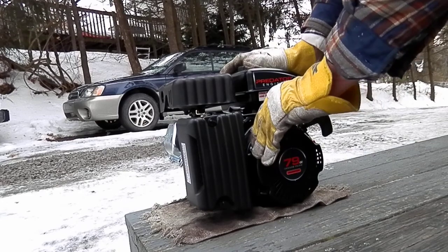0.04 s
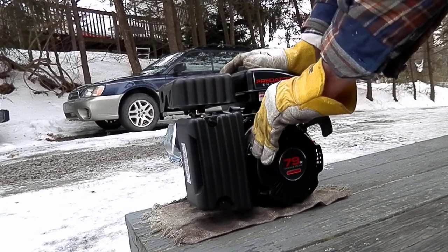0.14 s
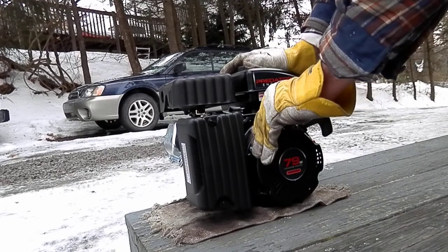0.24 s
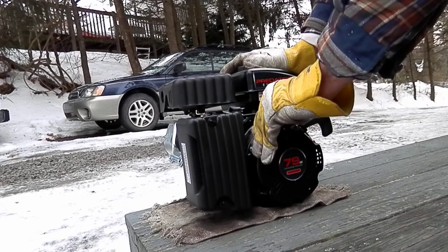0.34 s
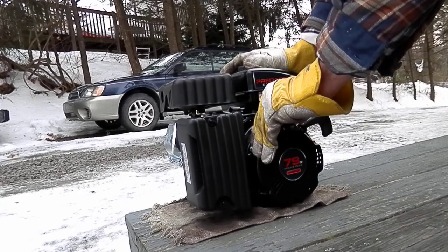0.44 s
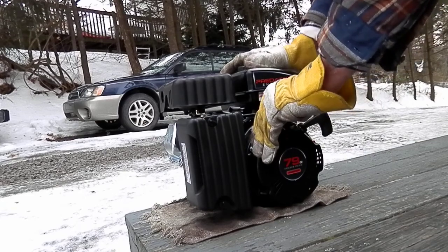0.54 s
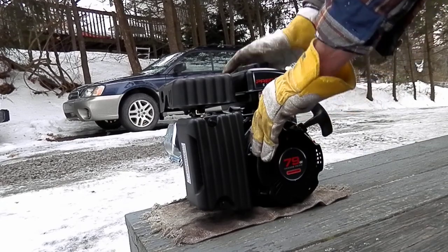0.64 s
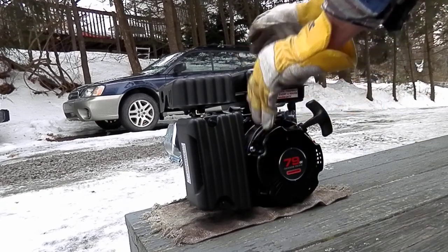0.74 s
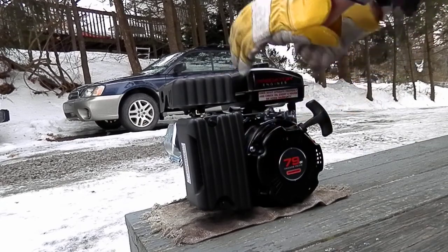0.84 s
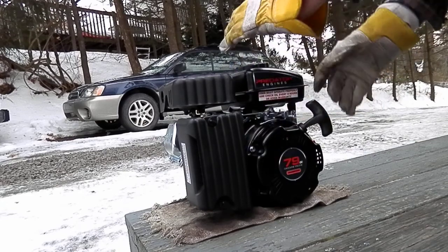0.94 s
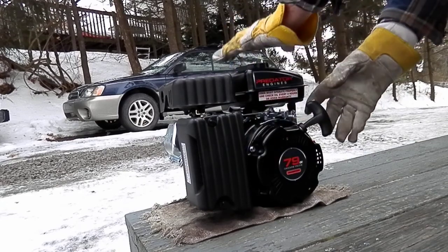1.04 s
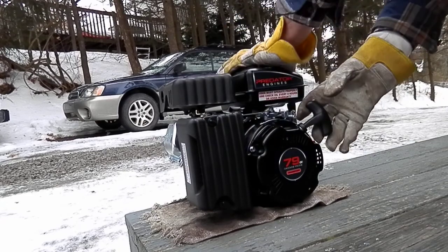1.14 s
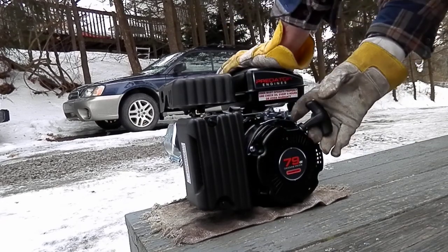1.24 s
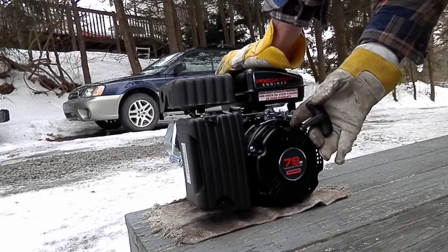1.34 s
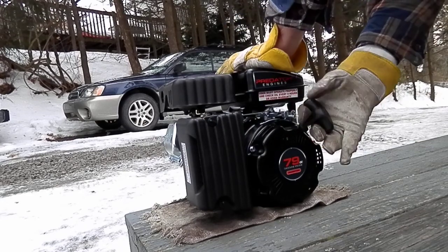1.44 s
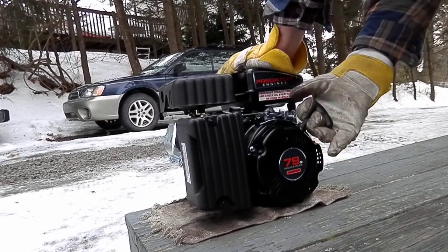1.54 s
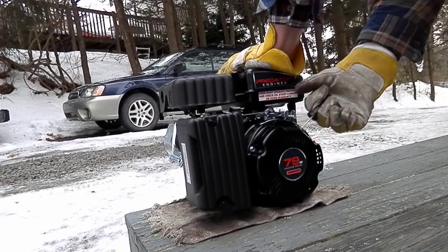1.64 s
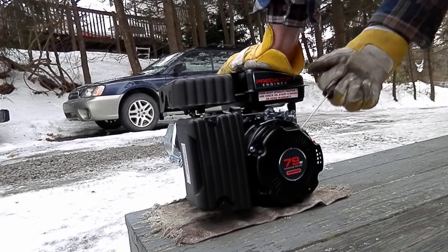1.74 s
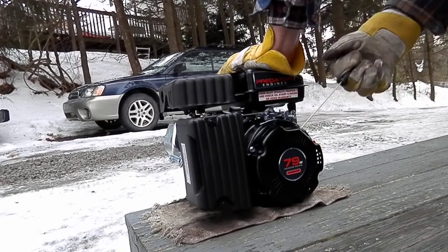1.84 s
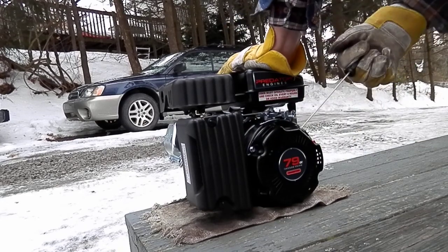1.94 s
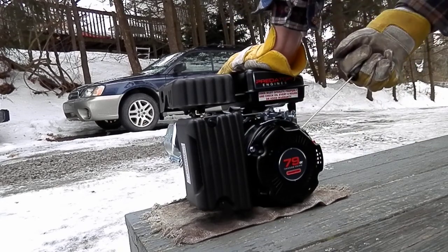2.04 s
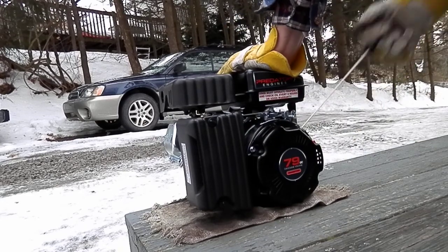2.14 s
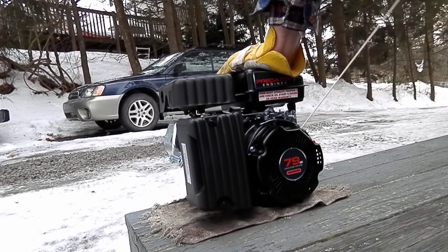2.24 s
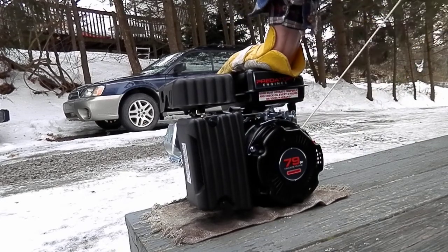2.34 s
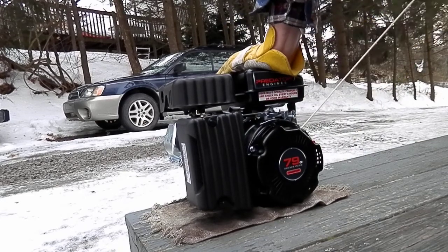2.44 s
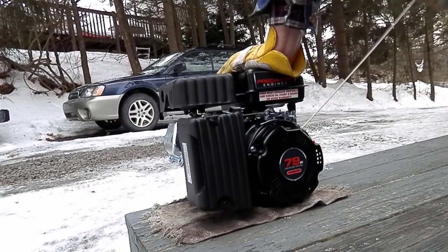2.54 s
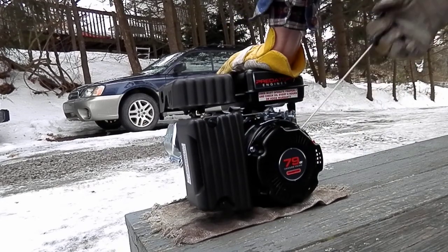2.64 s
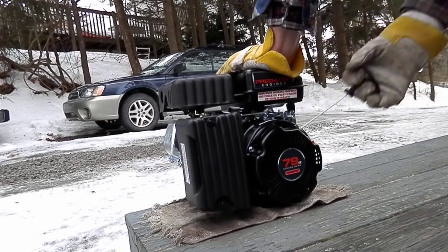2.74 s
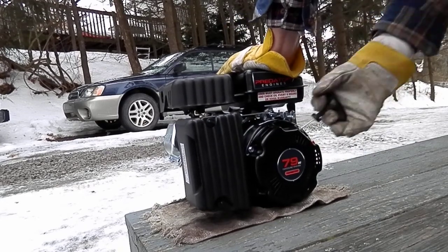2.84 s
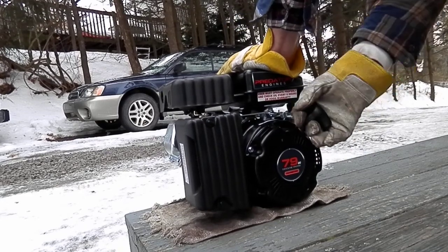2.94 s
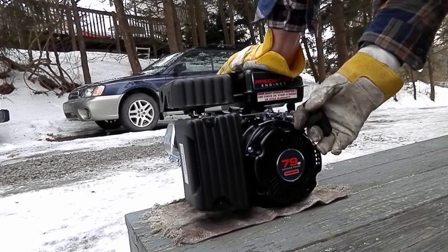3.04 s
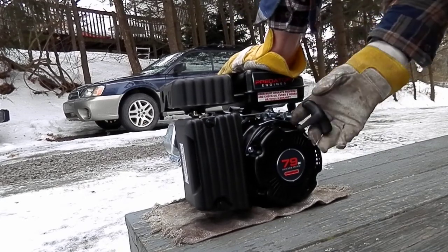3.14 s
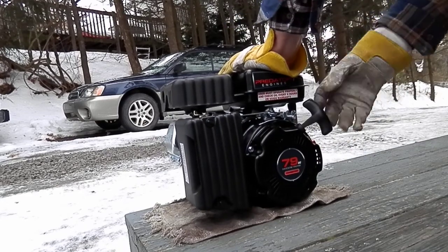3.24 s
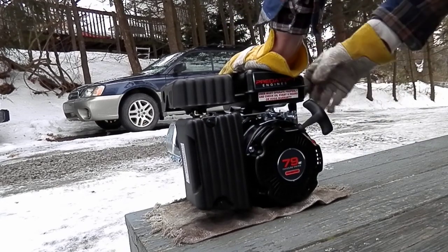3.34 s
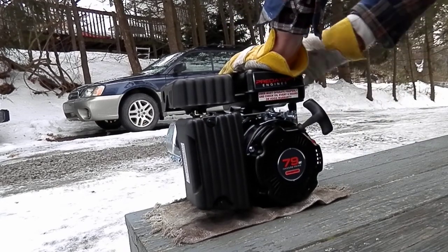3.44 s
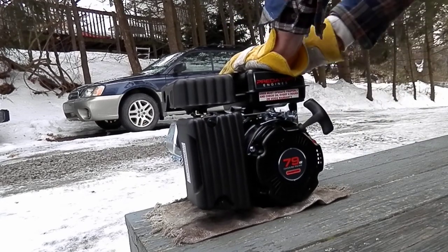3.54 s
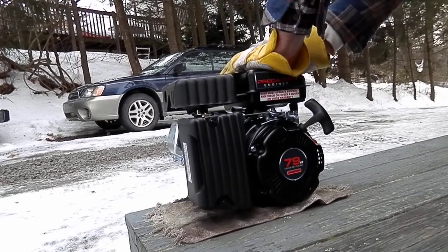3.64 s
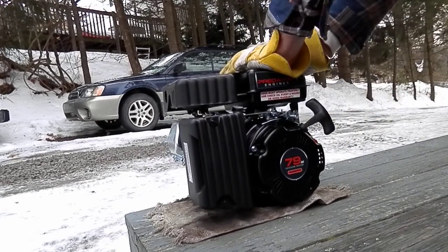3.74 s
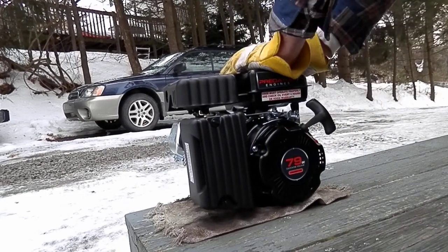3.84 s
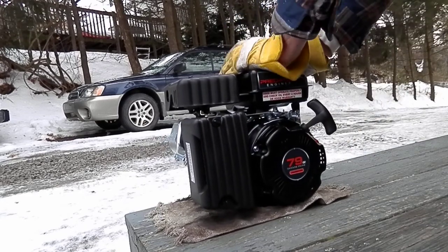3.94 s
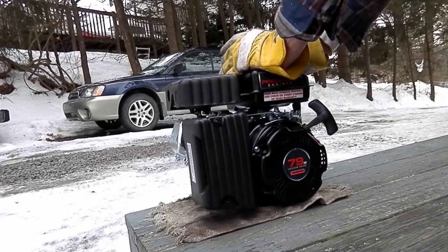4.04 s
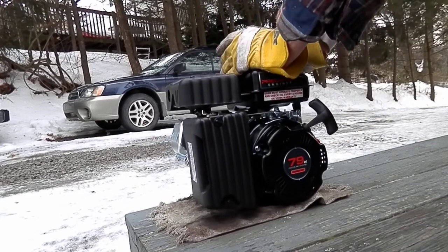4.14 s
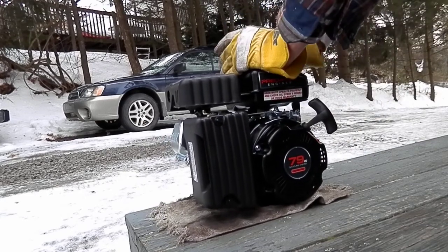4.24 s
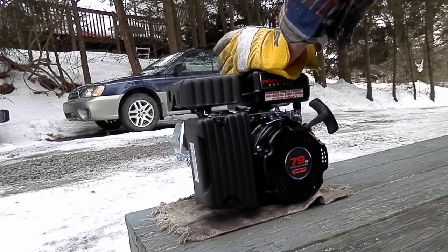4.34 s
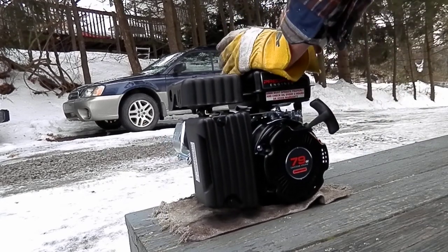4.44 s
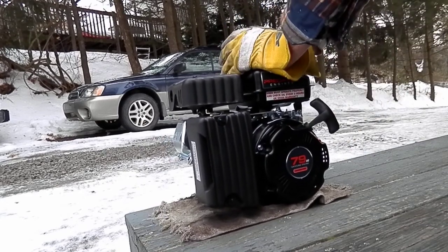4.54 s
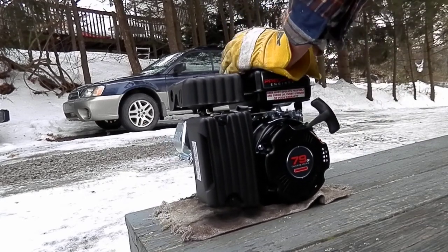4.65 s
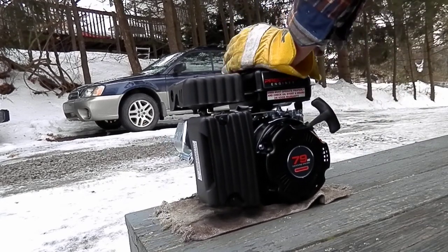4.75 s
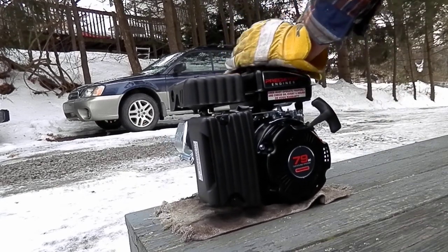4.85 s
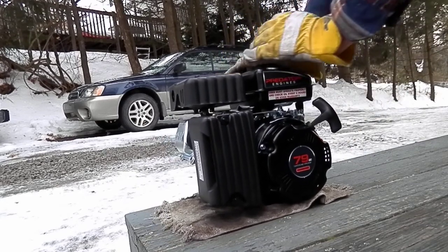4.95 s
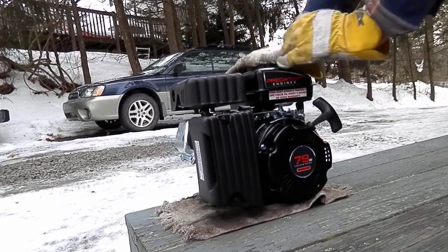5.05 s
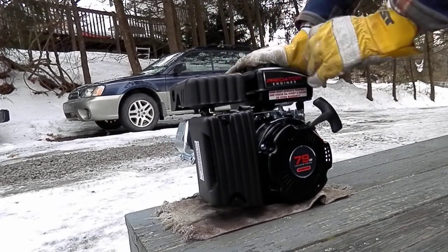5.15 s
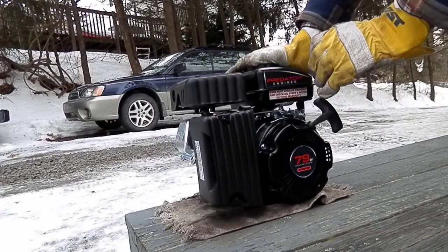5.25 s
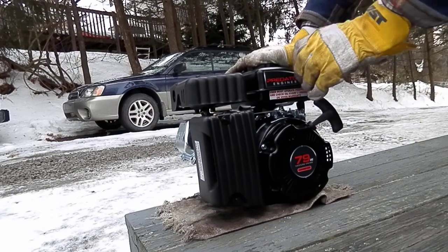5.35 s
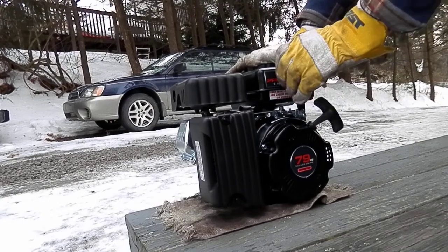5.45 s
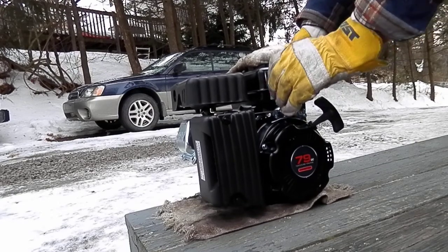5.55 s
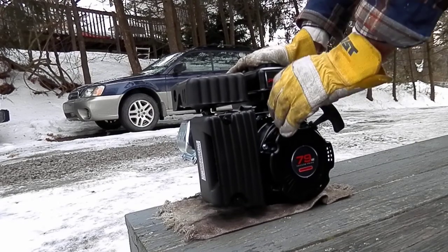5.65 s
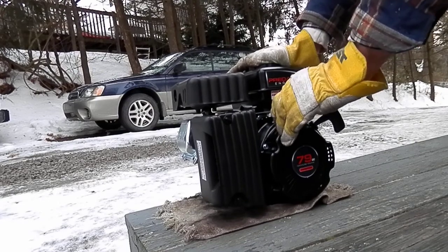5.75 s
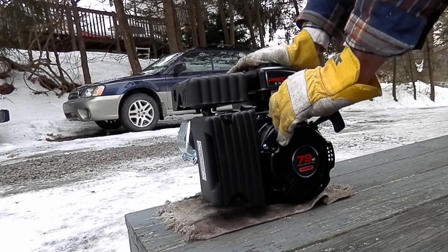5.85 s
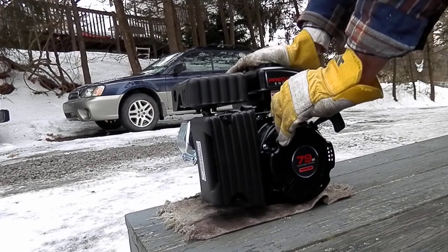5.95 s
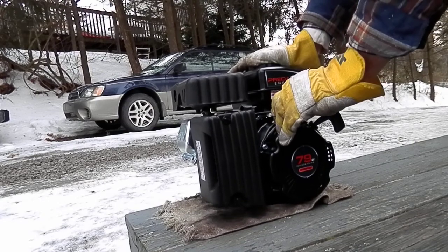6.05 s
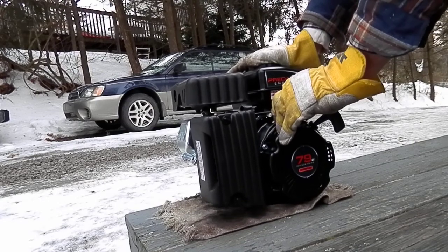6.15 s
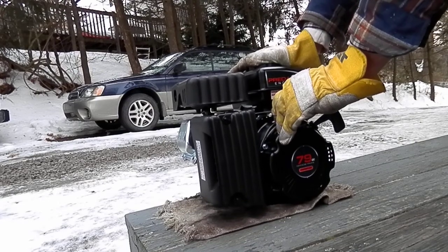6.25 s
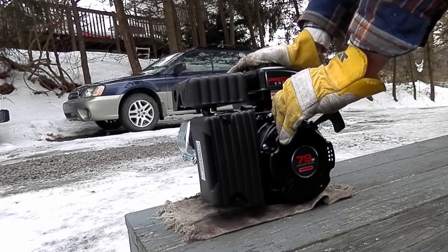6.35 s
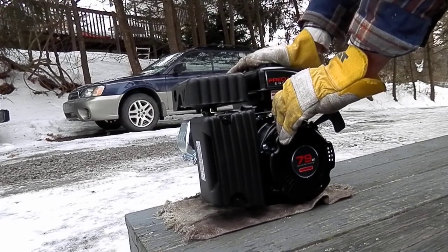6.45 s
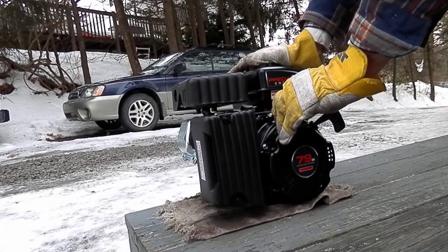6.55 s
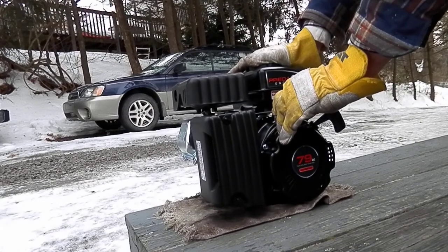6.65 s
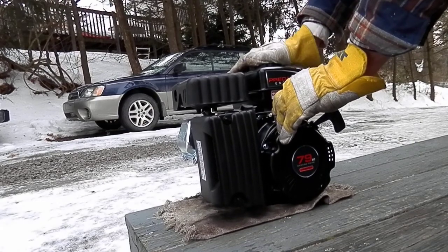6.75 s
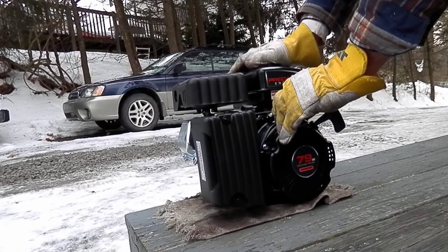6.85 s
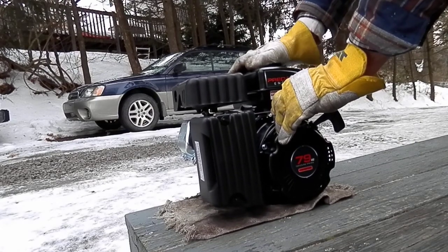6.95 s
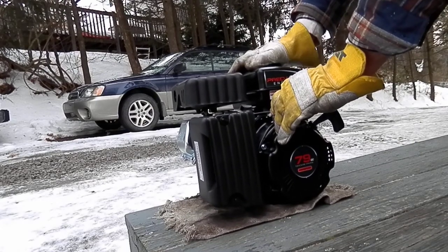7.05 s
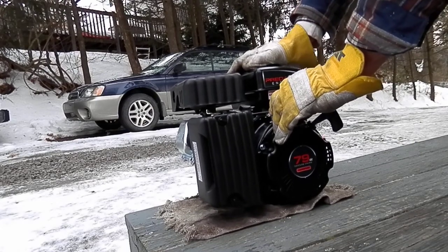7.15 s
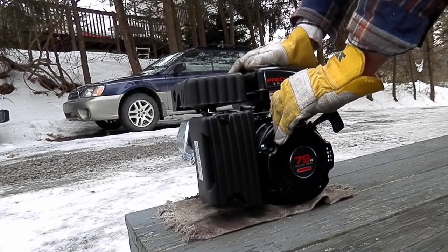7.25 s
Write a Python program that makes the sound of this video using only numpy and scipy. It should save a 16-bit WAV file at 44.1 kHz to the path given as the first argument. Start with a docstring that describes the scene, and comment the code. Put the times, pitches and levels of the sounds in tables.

```python
"""A glove clicks levers over a faint whine; then a starter cord rattles out twice and a small petrol
engine catches on an outdoor wooden bench. It coasts twice as the governor hunts, then settles.
Engine: pulses on one crank angle ring pipe, shroud and casing and gate noise; tones shake the bench.
Starter: ratchet clicks, gritty noise. Hand: noise ticks and struck modes.
Background: lumpy rumble noise, camera whine as two tones with pulsing hiss."""
import sys
import numpy as np
from scipy import signal
from scipy.fft import rfft, irfft
from scipy.io import wavfile
from scipy.ndimage import uniform_filter1d

SR = 44100
rng = np.random.default_rng(int(sys.argv[2]) if len(sys.argv) > 2 else 0)


def waveform_to_disk(signal):
    """Save audio, clipped to [-1, 1], as 16-bit WAV at the path in sys.argv[1]."""
    frames = np.transpose(np.atleast_2d(signal))
    scaled = np.clip(frames, -1, 1) * 32767
    samples = np.round(scaled).astype(np.int16)
    wavfile.write(sys.argv[1], SR, samples)


N = 321489
T = np.arange(N) / SR

# Spectrum levels are relative unless stated: each noise is brought to rms 1, then scaled.
# four-stroke cycle rate, two crank turns a cycle: t/s, f/Hz
CYCLE_RATE = [(2.35, 7.71), (2.47, 13.05), (2.57, 19.14), (2.74, 31.95), (2.83, 34.32), (3.05, 29.98),
              (3.27, 34.16), (3.45, 30.39), (3.7, 32.81), (4.08, 31.66), (4.47, 32.37), (4.64, 31.5),
              (4.95, 32.22), (5.33, 31.2), (5.56, 31.85), (5.73, 31.58), (6.05, 32.24), (6.74, 32.02),
              (7.12, 31.06), (7.29, 31.49)]
CATCH_S = CYCLE_RATE[0][0]
FIRST_CYCLE = .209  # share of a cycle done when the crank starts to spin
# charge does not burn: from/s, to/s
COASTS = [(2.81, 3.05), (3.3, 3.43)]
# burn strength as the governor works the throttle, re steady running: t/s, level/dB
LOAD = [(2.35, -22), (2.52, -7.5), (2.72, -2), (3.07, -6), (3.45, -3), (3.7, 0.5), (4, 1), (4.4, 1),
        (4.95, 3.5), (5.3, -0.5), (5.6, 1.5), (5.9, -2.5), (6.2, 3.5), (6.55, 1.5), (6.8, 1.5), (7.1, -3),
        (7.29, -4)]
# piston shake of the bench, twice a turn, hardest where a coast drags the speed down: t/s, level/dB
SHAKE = [(2.66, -27.5), (2.75, -19), (2.84, -28), (3.03, -15), (3.25, -24.5), (3.43, -10.5), (3.49, -18.5),
         (4.1, -21.5), (5.8, -20), (7.29, -18.5)]
# shake overtones: times per cycle, level/dB, lag/share of own period
SHAKE_OVERTONES = [(5, 2, 0.059), (6, -10, 0.35), (7, 1, 0.903), (8, -7, 0.41), (10, -11.5, 0.39)]
SHAKE_LAG = 0.33  # behind the firing, share of the shake's period
OVERTONES_DB, ROCK_DB = -33.5, -31.5  # at full speed
# one blast through the muffler: f/Hz, level/dB
MUFFLER = [(25, -49), (40, -24.5), (70, -21.5), (95, -13.5), (125, -1.5), (160, -13.5), (200, -8),
           (255, -16), (288, -9.5), (317, -23.5), (350, -16), (450, -29.5), (600, -47), (1000, -70.5)]
# piston gulping air: share of cycle, level/dB re blast, Gaussian width/s
INTAKE = (0.3728, -11, 0.00044)
LEAD_S = .0023  # low blast pulse, inverted, leads the spit by this
UNBURNT_DB, UNBURNT_SPIT_DB = -6.5, -22  # blast and spit left in a coast
# gas jet at the outlet: f/Hz, level/dB per Hz
SPIT = [(1760, -1), (3000, -5), (4700, -47), (5420, -0.5), (7110, 0.5), (8200, -4), (9730, 2), (10600, -5),
        (14300, 8.5), (16000, -1), (16500, -84)]
# outlet pipe modes: f/Hz, level/dB, t60/s
PIPE = [(533.6, -1, 0.06), (573.7, 5.5, 0.056), (704, -11, 0.14)]
# slow swell of the pipe ring: t/s, level/dB
PIPE_SWELL = [(3.5, -1.5), (4.4, 2.5), (5.4, -4), (6.3, 0.5), (7.29, -2.5)]
# thin fan shroud modes: f/Hz, level/dB, t60/s
SHROUD = [(904.2, -0.5, 0.13), (1036, -4, 0.091)]
# block, fin and cover modes: f/Hz, width/Hz, level/dB
CASING = [(990, 590, -0.5), (1498, 28, -14), (1620, 82, -7.5), (2268, 91, -7.5), (2970, 670, -11),
          (3636, 12, -18.5), (4110, 165, -13.5), (4580, 130, -13.5), (6900, 230, -18)]
# valve-train blows: share of cycle, level/dB, centre of modes shaken f/Hz, spread/octaves
VALVES = [(.03, -1, 2370, 0.6), (.335, 0.5, 2980, 1.65), (.46, 2.5, 1500, 0.69), (.62, -5.5, 2500, 1.5),
          (.83, -3, 1070, 0.35)]
# cooling fan and intake air: f/Hz, level/dB per Hz
FAN_AIR = [(40, -36), (115, -12), (160, -16.5), (400, -27), (800, -31.5), (1200, -25.5), (2000, -28),
           (4000, -34), (5500, -41.5), (10600, -52), (14300, -40.5), (16500, -111)]
# layer laws: running level/dB, share of load followed, level offset at the catch/dB, settling time/s
BLAST_LAW = (-22.5, 0.8, -1.5, 0.6)
SPIT_LAW = (-42, 1.22, 9.5, 0.37)
CLATTER_LAW = (-28, 0.49, -24, 0.55)
PIPE_LAW = (-27.5, 0.47, -12.5, .5)
SHROUD_LAW = (-31.5, 0.4, -28, 0.6)
# cord pulls: taut t/s, full speed t/s, let go t/s, level/dB, run-out/dB per s
PULLS = [(1.582, 1.715, 1.8, -37.5, 130), (2.075, 2.21, 2.325, -29.5, 30)]
SLACK_DB, STOP_DB, STOP_S = -22, -18, 0.017  # at cord taut; quick drop after let-go, its length
RATCHET_PER_S = 500  # mean tooth rate
# reel and glove rub: f/Hz, level/dB per Hz
REEL = [(35, -31), (60, -13), (169, -0.5), (342, -7.5), (384, -10.5), (895, -10), (1160, -25), (1570, -25),
        (3110, -28), (6920, -42), (13400, -31), (15400, -34), (16500, -54)]
# glove brushing the covers: middle t/s, level/dB, half length to 1/e /s
RUBS = [(.18, -58, .06), (0.289, -49.5, 0.043), (0.622, -64, 0.082), (.95, -68, 0.22), (1.42, -56.5, 0.21)]
# levers, pawls, cord handle: t/s, tick level/dB before dulling, knock level/dB, thud level/dB, knock f/Hz
KNOCKS = [(0.1364, -75, -45, -51, 810), (0.16, -67, -43, -50, 557), (0.2384, -40.5, -34, -52, 690),
          (0.2529, -55, -26, -50, 616), (0.278, -43.5, -24.5, -49, 680), (0.637, -60, -39, -50, 686),
          (0.662, -54, -41, -47, 760), (1.0975, -65.5, -45, -33, 566), (1.3969, -54.5, -30, -33, 705),
          (1.5151, -68, -40, -31, 580), (1.6035, -50, -42, -44, 654), (1.6124, -39.5, -32.5, -50, 705),
          (1.6661, -32.5, -24, -44, 663), (1.711, -36, -25, -17.5, 470), (1.7249, -35, -34, -17, 600),
          (1.7736, -29, -29, -44, 645), (1.7811, -32, -27, -39, 745), (1.976, -65, -48, -47, 585),
          (2.064, -56, -45, -27, 452), (2.077, -36.5, -27.5, -26, 615), (2.152, -38.5, -28, -20, 630),
          (2.1997, -28.5, -17.5, -33, 730), (2.2119, -32, -38, -3.5, 830), (2.2234, -35, -23, -11, 600),
          (2.2543, -60, -23.5, -29, 935), (2.3063, -38, -25, -19, 610), (2.3253, -29.5, -49, -42, 546),
          (2.341, -62, -43, -21, 568), (2.37, -51, -37, -40, 720)]
# tick colour: f/Hz, level/dB per Hz
TICK = [(590, -29), (1000, -8), (1540, -11), (2170, -3), (2470, -2), (3940, -7.5), (4760, -5.5),
        (6230, -14), (14200, -5.5), (16500, -17)]
TICK_T60_S = 0.047
DULL_LOUD, DULL_PER_DB, LOUD_DB = 0.26, .03, -40  # one-pole coefficient; softer ticks are duller
# plastic covers: ratio to knock pitch, level/dB, t60/s
COVERS = [(.8, -4, .03), (1, 0, .06), (1.37, -6, .03), (1.8, -12, .02)]
# starter metal modes: f/Hz, level/dB, t60/s
PAWL = [(8460, 2, 0.064), (10100, -2, 0.084), (11200, -12, 0.06), (12840, -16, 0.05)]
# pawls snapping out or back: t/s, level/dB
PAWL_RINGS = [(1.667, -35), (1.7248, -37), (1.7811, -54), (2.1999, -46), (2.323, -43)]
# bench plank modes: f/Hz, level/dB, t60/s
BENCH = [(124, 4.5, 0.074), (150, 5.5, 0.043), (226, -9, 0.15)]
# fuel tank modes: f/Hz, level/dB, t60/s
TANK = [(325, 6, 0.38), (550, -18, 0.26), (1040, -21, 0.3)]
# tank knocks: t/s, level/dB
TANK_TAPS = [(.645, -38), (1.781, -39.5)]
# far traffic and air: f/Hz, level/dB per Hz
YARD = [(12, -54.5), (20, -9), (43, -24), (75, -3.5), (125, -14), (455, -28), (900, -33.5), (1220, -53),
        (1790, -50), (3860, -74), (5080, -63), (7870, -79), (14000, -58)]
YARD_DB = -47.5
# camera electronics: f/Hz, level/dB before the fade
WHINE = [(14955, -74), (15315, -75)]
# whine sinks once things get loud: t/s, level/dB
WHINE_FADE = [(0, 3), (1.7, 4.5), (1.76, -6), (7.29, -12)]
# hiss around the whine: f/Hz, level/dB per Hz
BUZZ = [(12000, -53.5), (14300, -1), (15000, 12), (15700, -15), (16500, -20)]
BUZZ_HZ, BUZZ_DB = 59.94, -71.5  # pulse rate; level before the fade
LOW_CUT_HZ, EDGE_HZ = 21, 16650  # microphone bass roll-off; upper band limit
CEILING = 0.89  # where the input stage flattens


def amp(db):
    """Linear gain of a dB level."""
    return 10 ** (np.asarray(db) / 20)


def evened(x):
    """Signal scaled to rms 1."""
    return x / np.sqrt(np.mean(x ** 2) + 1e-20)


def curve(rows):
    """Second column of a table, interpolated over time."""
    times_s, values = np.transpose(rows)
    return np.interp(T, times_s, values)


def gains(points, size):
    """Spectrum in dB per FFT bin, straight over log frequency."""
    hz, db = np.transpose(points)
    bins_hz = np.fft.rfftfreq(size, 1 / SR)
    return np.interp(np.log(bins_hz + 1), np.log(hz + 1), np.maximum(db, -100))


def noise(points):
    """Noise of rms 1 with the given spectrum."""
    white = rng.standard_normal(N)
    return evened(irfft(rfft(white) * amp(gains(points, N)), N))


def causal(points, size=8192):
    """Minimum-phase response with the given spectrum."""
    log_gain = np.log(amp(gains(points, size)))
    circle = np.r_[log_gain, log_gain[-2:0:-1]]
    phase = -signal.hilbert(circle).imag[:len(log_gain)]
    return irfft(np.exp(log_gain + 1j * phase), size)[:size // 2]


def ring(modes, size=8000):
    """Response of struck modes: decaying sines, peak 1."""
    t = T[:size]
    x = sum(amp(db - 60 * t / t60_s) * np.sin(2 * np.pi * hz * t) for hz, db, t60_s in modes)
    return x / abs(x).max()


def driven(excitation, response):
    """Response set off by the excitation, cut to the excitation's length."""
    return signal.oaconvolve(excitation, response)[:len(excitation)]


def add(mix, s, sound):
    """Mix a sound in at a time in s."""
    part = mix[round(s * SR):][:len(sound)]
    part += sound[:len(part)]


def follow(law):
    """Gain of an engine layer: settles from its catch offset and takes a share of the load."""
    running_db, share, offset_db, settle_s = law
    since_s = np.maximum(T - CATCH_S, 0)
    return amp(running_db + share * curve(LOAD) + offset_db * np.exp(-since_s / settle_s))


def beats(cycles, share, scatter):
    """One impulse per cycle as the crank passes the given share, scattered in strength."""
    count = np.floor(cycles - share + 1).astype(int)
    return np.r_[0, np.diff(count)] * scatter[count]


def engine():
    """All layers follow one crank angle, the running sum of the cycle rate."""
    spinning = T >= CATCH_S
    cycles = FIRST_CYCLE + np.cumsum(curve(CYCLE_RATE) * spinning) / SR
    luck = rng.standard_normal((200, 8))  # per cycle: burn, jet, five valve blows, intake
    coasting = sum((T > a) & (T < b) for a, b in COASTS)
    burns = amp(UNBURNT_DB * coasting)
    fired = beats(cycles, 0, amp(0.97 * luck[:, 0])) * burns
    rough = driven(fired, np.exp(-T[:900] / 0.005)) * rng.standard_normal(N)
    outlet = blast(cycles, luck, burns) + pipe(cycles, luck, burns, rough) + shroud(fired, rough)
    busy = follow(CLATTER_LAW) * spinning
    machinery = busy * (valve_clatter(cycles, luck) + fan_air(cycles))
    return outlet + spit(cycles, luck, coasting) + bench_shake(cycles) + machinery


def blast(cycles, luck, burns):
    """Inverted low impulses at the outlet and soft intake gulps, coloured by the muffler."""
    share, db, width_s = INTAKE
    lead = LEAD_S * curve(CYCLE_RATE)
    soft = np.exp(-.5 * ((T[:600] - T[300]) / width_s) ** 2)
    intake = beats(cycles, share - lead, amp(db + 1.0 * luck[:, 7])) * burns
    gulp = -signal.oaconvolve(intake, soft / soft.sum(), "same")
    low_pulse = -beats(cycles, -lead, amp(0.7 * luck[:, 0])) * burns
    return evened(driven(gulp + low_pulse, causal(MUFFLER))) * follow(BLAST_LAW)


def pipe(cycles, luck, burns, rough):
    """Each blast and its rough gas ring the outlet pipe."""
    hits = beats(cycles, -0.032, amp(0.44 * luck[:, 0])) * burns
    rung = evened(driven(hits + 0.041 * rough, ring(PIPE)))
    return rung * follow(PIPE_LAW) * amp(curve(PIPE_SWELL))


def shroud(fired, rough):
    """Each firing rings the thin fan shroud."""
    return evened(driven(fired + 0.033 * rough, ring(SHROUD))) * follow(SHROUD_LAW)


def spit(cycles, luck, coasting):
    """Turbulent jet: noise gated by a sharp puff, then a slower hiss."""
    jet = beats(cycles, 0, amp(3.3 * luck[:, 1])) * amp(UNBURNT_SPIT_DB * coasting)
    t = T[:1500]
    puff = np.exp(-t / 0.0029) + 0.22 * np.exp(-t / 0.013)
    puff = puff * (1 - np.exp(-t / 0.00027))
    return evened(noise(SPIT) * driven(jet, puff)) * follow(SPIT_LAW)


def bench_shake(cycles):
    """Piston shakes the bench twice a turn, with overtones; the unbalanced crank rocks it once."""
    sway = amp(curve(SHAKE)) * np.clip((T - 2.58) / 0.027, 0, 1)
    # the shake's strength wavers slowly at random
    sway = sway * amp(1.4 * evened(uniform_filter1d(rng.standard_normal(N), 2500)))
    shake = sway * np.cos(2 * np.pi * (4 * cycles - SHAKE_LAG))
    overtones = sum(amp(db) * np.cos(2 * np.pi * (times * cycles - lag))
                    for times, db, lag in SHAKE_OVERTONES)
    rock = np.cos(2 * np.pi * (2 * cycles - .3))
    onset = np.clip((T - 2.55) / 0.15, 0, 1)
    return np.sqrt(2) * (shake + onset * (amp(OVERTONES_DB) * overtones + amp(ROCK_DB) * rock))


def valve_clatter(cycles, luck):
    """Each valve blow, a sharp tap and short rattle, rings the casing modes near its centre."""
    clatter, rattle = 0, rng.standard_normal(N)
    for k, (share, db, centre_hz, spread) in enumerate(VALVES):
        tap = beats(cycles, share, amp(db + 1.5 * luck[:, 2 + k]))
        blow = 8.5 * tap + rattle * driven(tap, np.exp(-T[:600] / 0.0034))
        modes = []
        for hz, width_hz, mode_db in CASING:
            off_centre_db = 6 * (np.log2(hz / centre_hz) / spread) ** 2
            modes.append((hz, mode_db - off_centre_db + 10 * np.log10(width_hz), 2.77 / width_hz))
        clatter = clatter + driven(blow, ring(modes))
    return evened(clatter)


def fan_air(cycles):
    """Fan and intake noise, fluttering once a cycle."""
    flutter = 1 + 0.21 * np.cos(2 * np.pi * (cycles - .2))
    return amp(-1.5) * noise(FAN_AIR) * flutter


def pull(taut_s, fast_s, let_go_s, db, run_out_db_per_s):
    """Effort of one cord pull: speeds up, holds, drops, runs out."""
    shape_db = np.interp(T, [taut_s, fast_s, let_go_s, let_go_s + STOP_S], [SLACK_DB, 0, 0, STOP_DB])
    run_out_db = run_out_db_per_s * np.maximum(T - let_go_s, 0)
    return amp(db + shape_db - run_out_db) * (T > taut_s)


def starter():
    """Glove and cord rub as gritty noise; dense uneven ratchet teeth ring the casing."""
    strengths = amp(3. * rng.exponential(1, N).clip(0, 3))
    clicks = (rng.random(N) < RATCHET_PER_S / SR) * strengths
    grit = 1 + .5 * driven(clicks, np.exp(-T[:300] / 0.0029))
    modes = [(hz, 10 * np.log10(width_hz) + 0.84 * db, 3.2 / width_hz)
             for hz, width_hz, db in CASING[:-1]]
    teeth = driven(clicks, ring(modes))
    glove = sum(amp(db) * np.exp(-((T - s) / half_s) ** 2) for s, db, half_s in RUBS)
    cord = sum(pull(*row) for row in PULLS)
    return (glove + cord) * evened(noise(REEL) * grit) + amp(-9) * cord * evened(teeth)


def handling():
    """Knocks: noisy tick, struck covers, bench thud; pawls and tank ring."""
    out, t, colour = np.zeros(N), T[:6000], causal(TICK, size=1024)
    colour = colour / np.linalg.norm(colour)

    def scrape(grit):
        """Decaying noise in the tick's colour."""
        return driven(grit * amp(-60 * t / TICK_T60_S), colour)

    for s, tick_db, knock_db, thud_db, hz in KNOCKS:
        grit = rng.standard_normal(len(t))
        dull = np.clip(DULL_LOUD + DULL_PER_DB * max(LOUD_DB - tick_db, 0), 0, .85)
        add(out, s, amp(tick_db) * signal.lfilter([1], [1, -dull], scrape(grit)))
        modes = [(ratio * hz, db, t60_s) for ratio, db, t60_s in COVERS]
        cover = driven(grit * amp(-60 * t / .025), ring(modes))
        add(out, s, amp(knock_db) * cover / abs(cover).max())
        add(out, s, amp(thud_db) * ring(BENCH) * np.minimum(T[:8000] / 0.0026, 1))
    for s, db in PAWL_RINGS:
        metal = driven(scrape(rng.standard_normal(len(t))), ring(PAWL))
        add(out, s, amp(db) * metal / abs(metal).max())
    for s, db in TANK_TAPS:
        add(out, s, amp(db) * ring(TANK, size=16000) * np.minimum(T[:16000] / 0.013, 1))
    return out


def camera_whine():
    """Two steady tones and a hiss pulsing at the buzz rate, under one fade."""
    pulses = np.exp(-((T * BUZZ_HZ - .2) % 1) / .2)
    tones = sum(np.sqrt(2) * amp(db) * np.sin(2 * np.pi * hz * T) for hz, db in WHINE)
    buzz = amp(BUZZ_DB) * evened(noise(BUZZ) * (pulses + .2))
    return (tones + buzz) * amp(curve(WHINE_FADE))


def yard():
    """Far traffic and air: noise with a slow random level."""
    lumps = amp(2.3 * evened(uniform_filter1d(rng.standard_normal(N), 4000)))
    return amp(YARD_DB) * noise(YARD) * lumps


def scene():
    """Sum of all sources, one channel."""
    return (engine() + starter() + handling() + camera_whine() + yard())[None]


def record(dry):
    """Bass roll-off, soft overload, then the band limit."""
    thinned = signal.lfilter(*signal.butter(2, LOW_CUT_HZ, "high", fs=SR), dry)
    rounded = CEILING * np.tanh(thinned / CEILING)
    band = signal.firwin(511, EDGE_HZ, window=("kaiser", 9), fs=SR)
    return signal.oaconvolve(rounded, band[None], "same")


dry = scene()
out = record(dry)
waveform_to_disk(out)
```